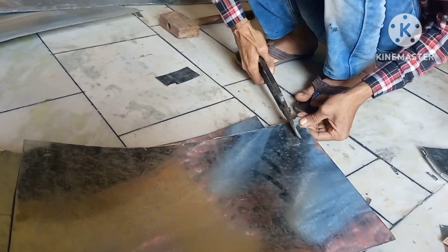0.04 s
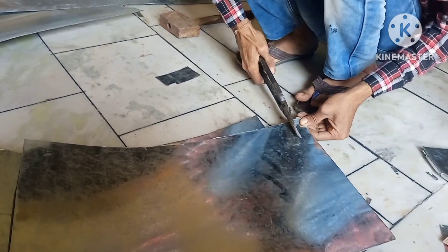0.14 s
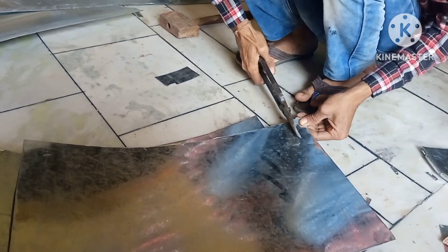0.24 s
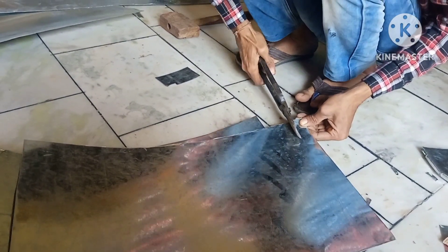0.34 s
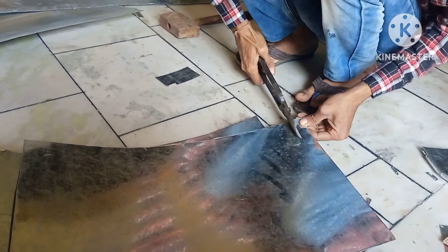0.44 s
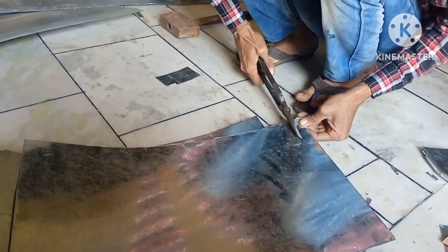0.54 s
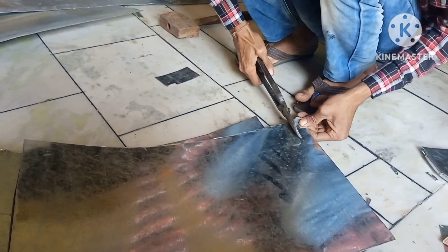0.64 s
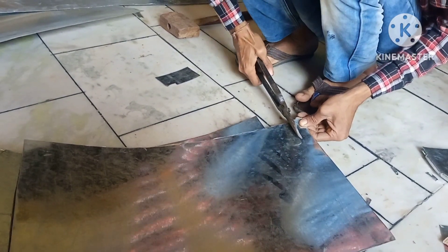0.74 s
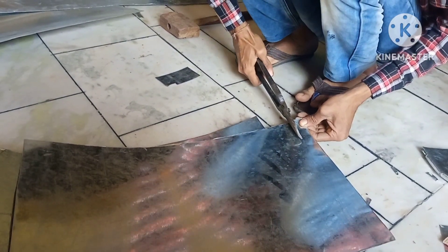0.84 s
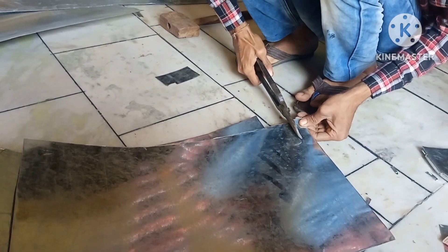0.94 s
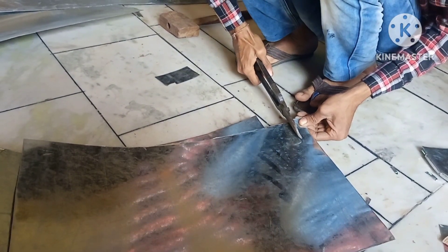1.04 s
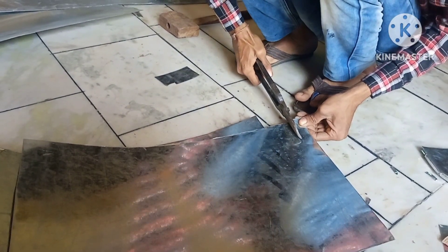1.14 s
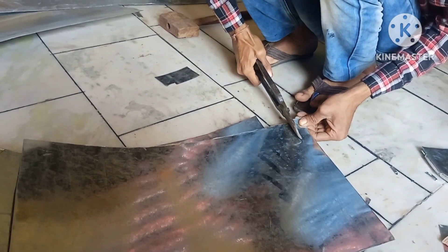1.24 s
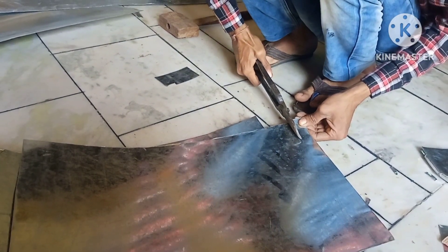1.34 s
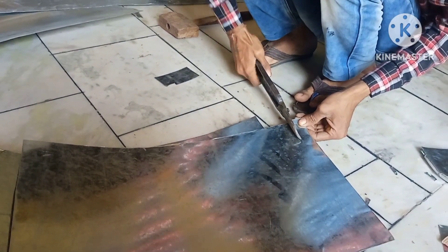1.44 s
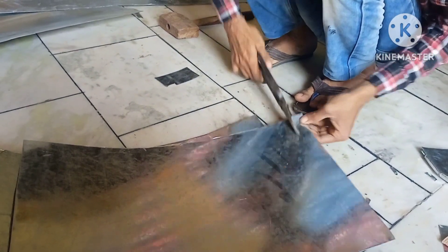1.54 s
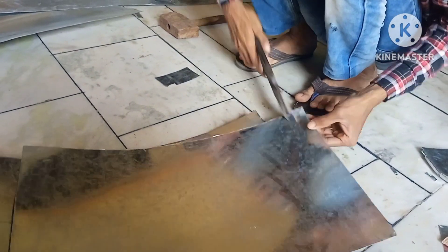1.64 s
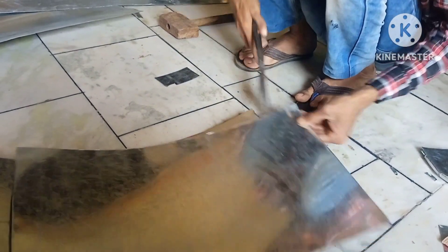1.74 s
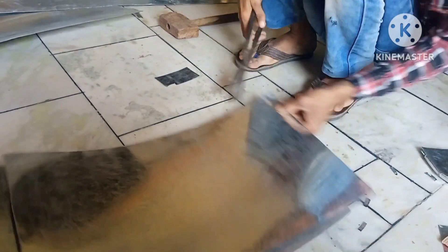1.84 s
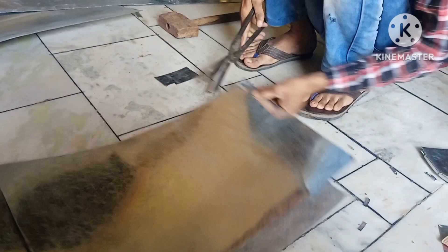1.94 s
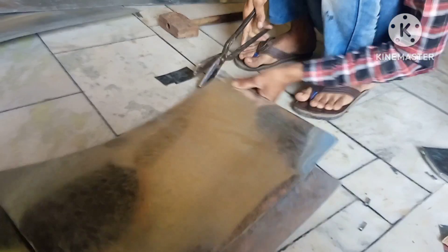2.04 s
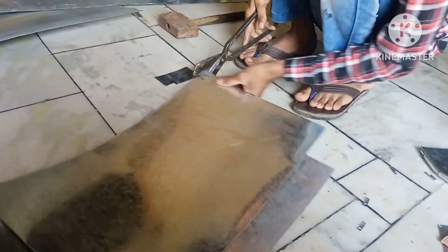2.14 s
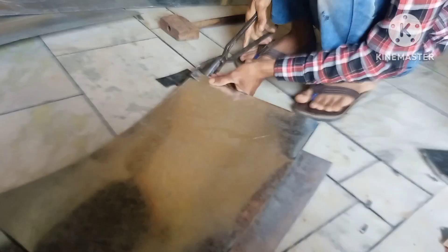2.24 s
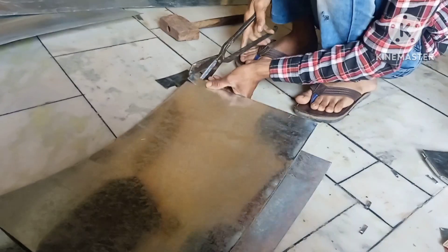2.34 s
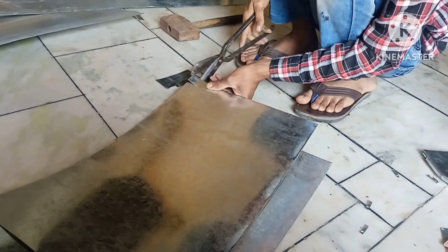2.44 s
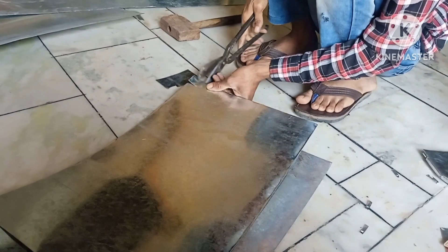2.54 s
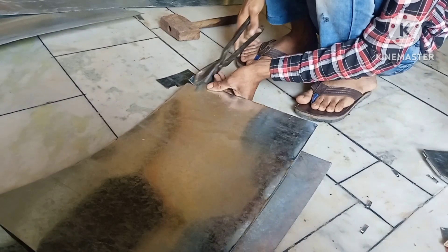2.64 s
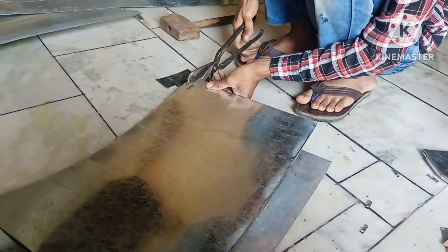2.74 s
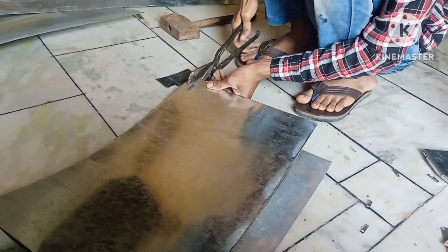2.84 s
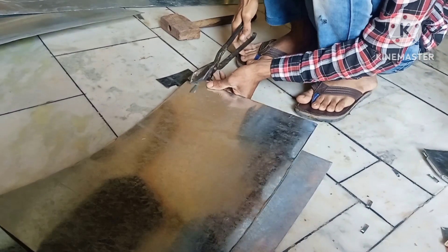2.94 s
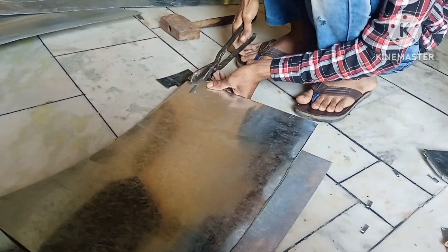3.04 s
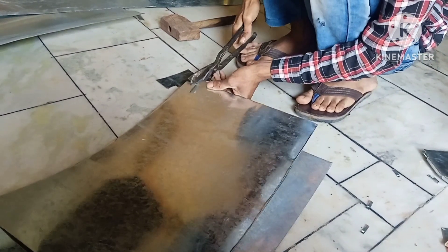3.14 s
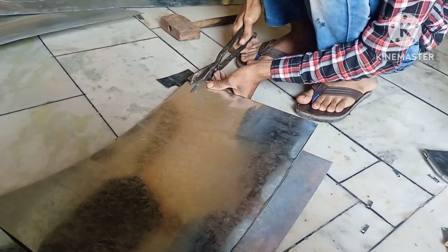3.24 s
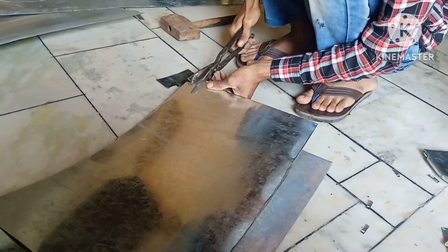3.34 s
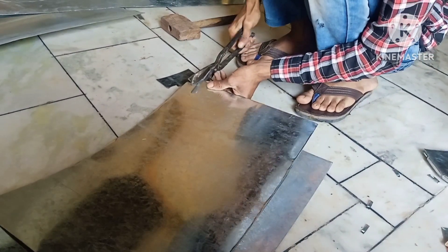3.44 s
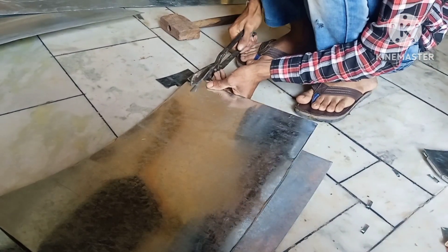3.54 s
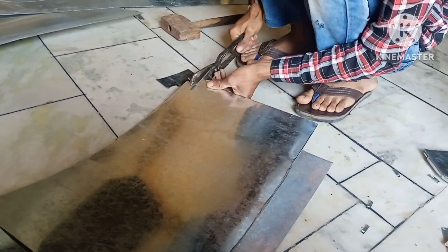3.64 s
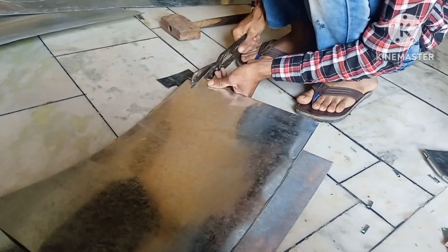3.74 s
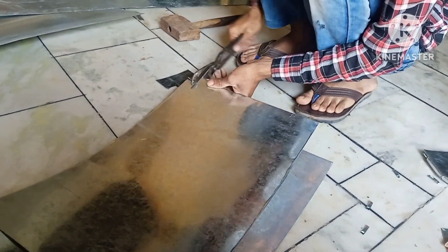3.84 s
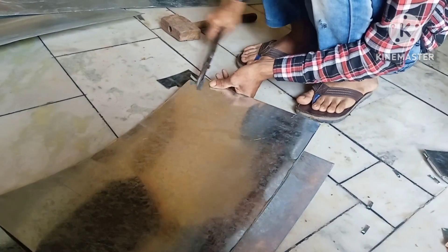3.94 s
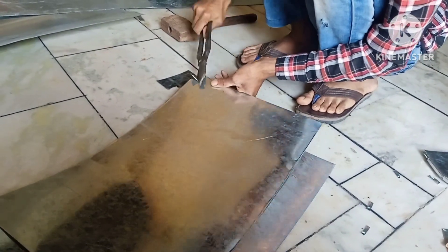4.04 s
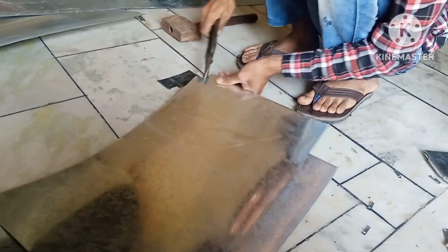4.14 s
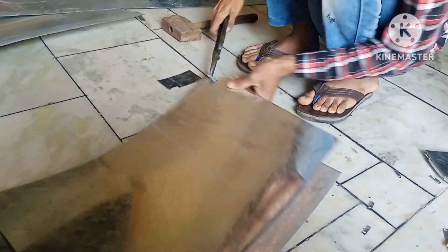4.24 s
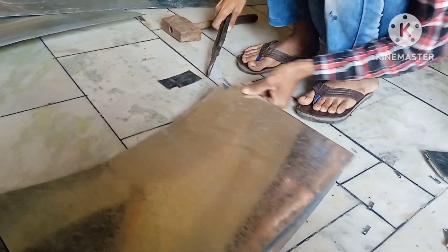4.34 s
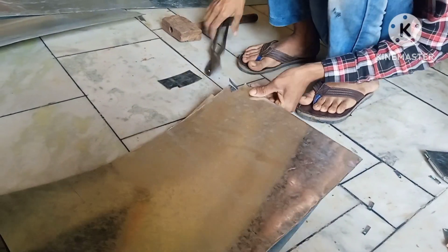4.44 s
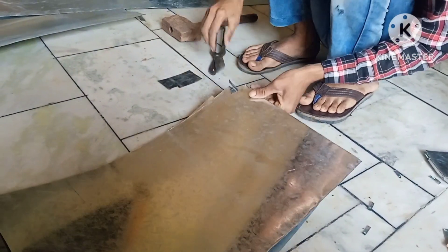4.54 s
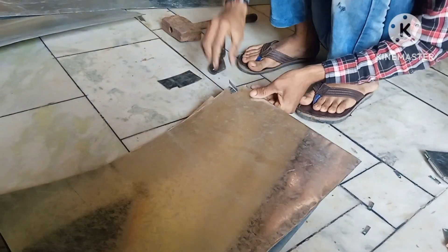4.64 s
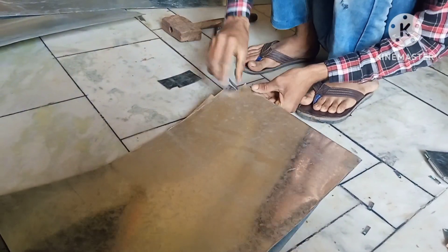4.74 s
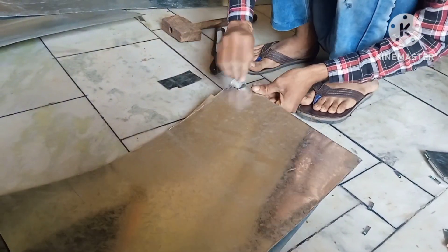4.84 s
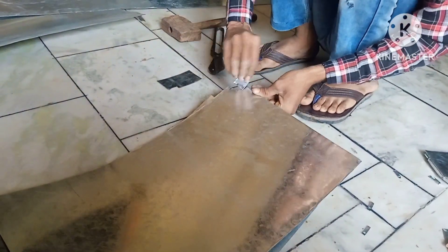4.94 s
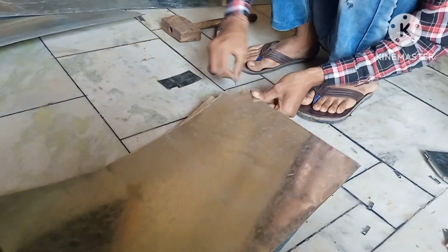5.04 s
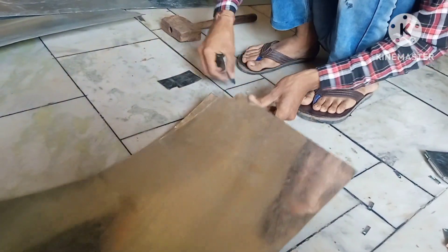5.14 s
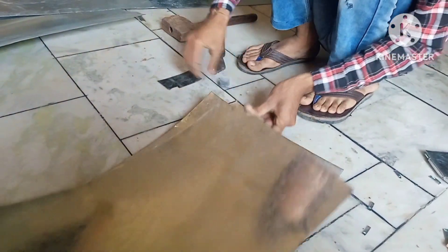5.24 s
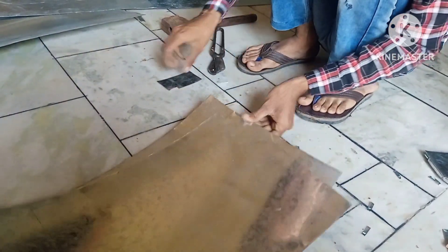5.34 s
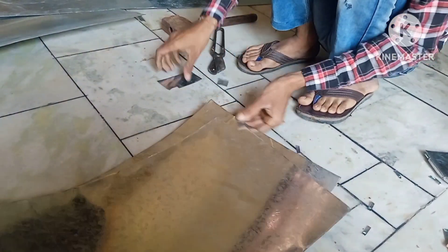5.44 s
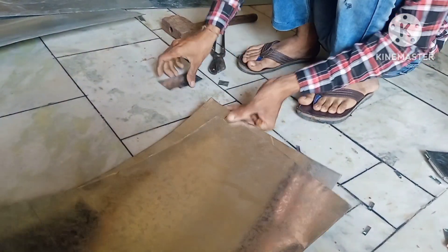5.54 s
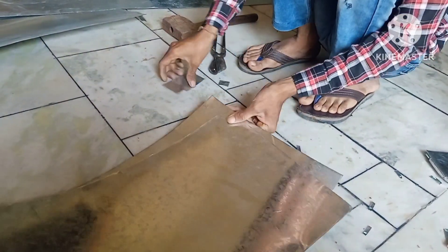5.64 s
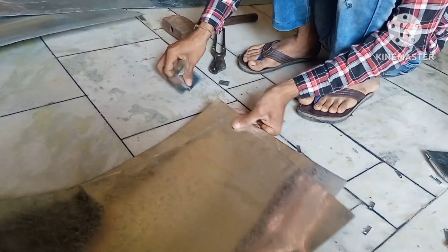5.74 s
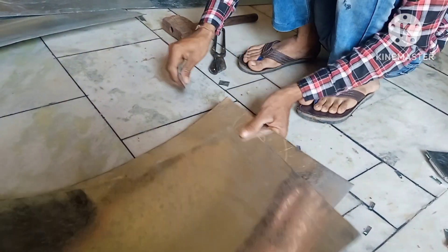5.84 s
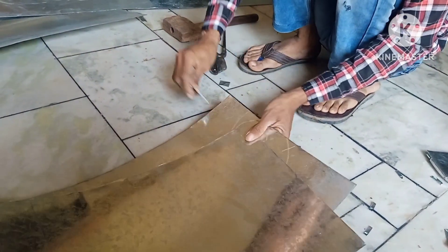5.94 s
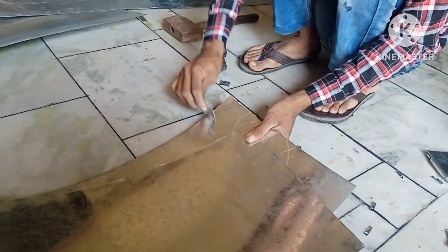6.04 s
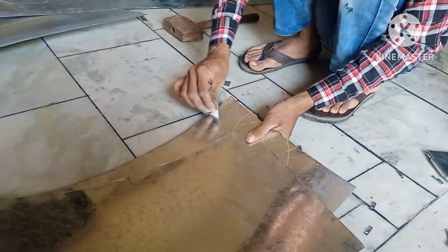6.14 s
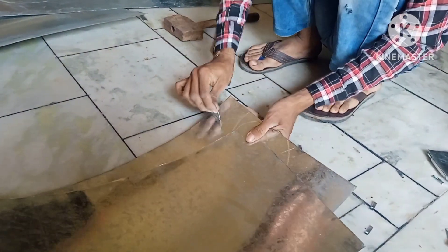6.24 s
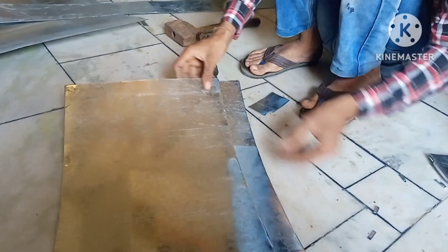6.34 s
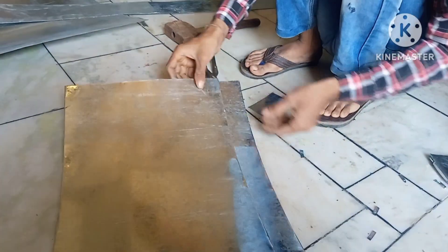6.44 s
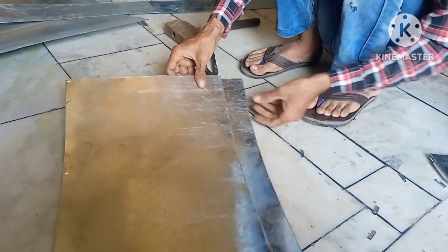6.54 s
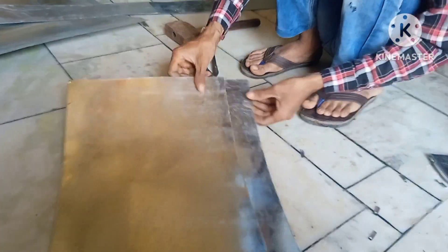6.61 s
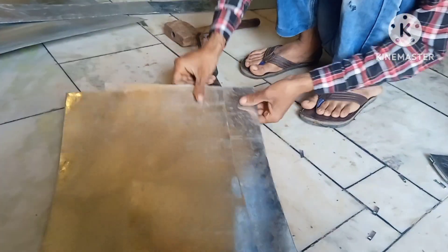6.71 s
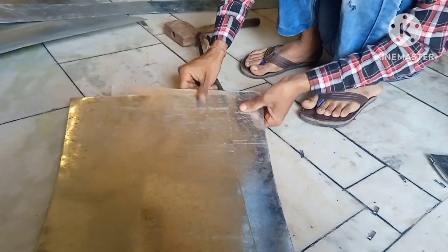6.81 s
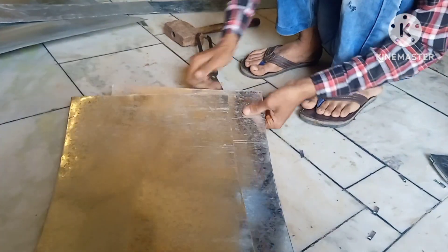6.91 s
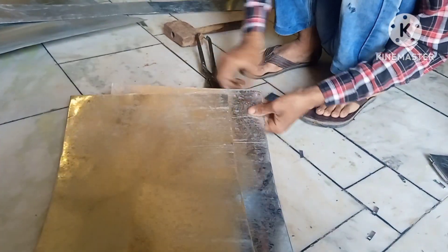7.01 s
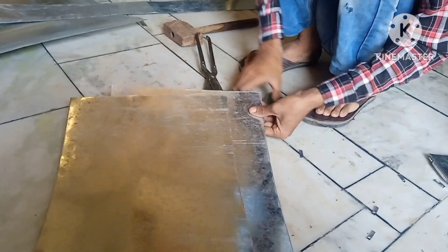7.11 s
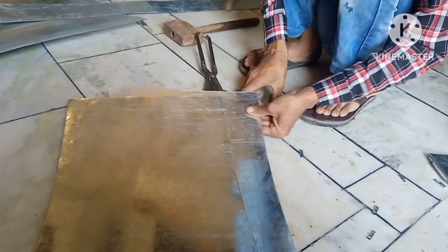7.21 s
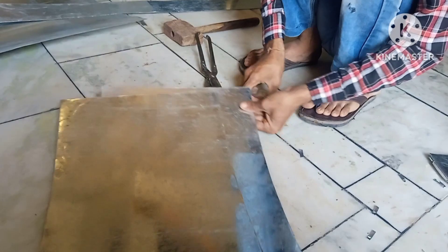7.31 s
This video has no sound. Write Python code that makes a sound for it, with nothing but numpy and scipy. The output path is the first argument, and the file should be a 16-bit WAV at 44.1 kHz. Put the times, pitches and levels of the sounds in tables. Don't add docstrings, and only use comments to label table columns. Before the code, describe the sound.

Close to a phone-like microphone in a hard-walled tiled workshop, a thin steel sheet gives soft bumps and a faint creak in the first 0.3 seconds, then there is quiet hum, fan drone and distant traffic, with barely audible squeaks around 1.2-1.5. At 1.6-2.2 the sheet is dragged, wobbling and scraping with sharp ticks; a strong hollow slap lands at 2.3, another at 2.65, and a corner springs free with a throbbing twang at 2.8. A duller slap at 3.15 leads to a lull with small ticks. Scraping swells at 4.2; snips hit the tiles from 4.35, bouncing hard at 4.55-4.65 with bright ringing. The fan weakens around 5. A small offcut rattles high and glassy at 5.3-5.7 as the sheet slides. The loudest bang cracks at 6.1, with further slaps to 6.3, then softer rubbing and ticks fade to 7.4.

```python
import sys
import numpy as np
from scipy import signal
from scipy.fft import rfft, irfft, next_fast_len
from scipy.io import wavfile
from scipy.ndimage import uniform_filter1d, map_coordinates

SR = 44100
rng = np.random.default_rng(int(sys.argv[2]) if len(sys.argv) > 2 else 0)


def how_loud(loudness_db):
    steps = np.asarray(loudness_db, float) / 20
    return 10 ** steps


def waveform_to_disk(signal):
    frames = np.transpose(np.atleast_2d(signal))
    scaled = np.clip(frames, -1, 1) * 32767
    samples = np.round(scaled).astype(np.int16)
    wavfile.write(sys.argv[1], SR, samples)


N = 325017
TIME = np.arange(N) / SR
POWER_STEP = SR // 1000


def unit(x):
    return x / np.sqrt(np.mean(x ** 2) + 1e-20)


def along(points, hz):
    f, v = np.transpose(points)
    return np.interp(np.log(hz + 1), np.log(f + 1), v)


def after(s, length):
    return slice(round(s * SR), round((s + length) * SR))


def wobble(rate, near=slice(None)):
    knots = rng.standard_normal(int(N * rate / SR) + 4)
    return map_coordinates(knots, [TIME[near] * rate])


def coloured(x, spectrum):
    m = next_fast_len(N + 8192)
    gain = how_loud(along(spectrum, np.fft.rfftfreq(m, 1 / SR)))
    return unit(irfft(rfft(x, m) * gain, m)[:N])


def shaken(spectrum, grain_db, modes_db):
    grains = rng.standard_normal(N) * how_loud(grain_db * wobble(700) + 0.5 * grain_db * wobble(60))
    z = signal.stft(grains, nperseg=1024)[2]
    field = uniform_filter1d(rng.standard_normal(z.shape), size=6, axis=1)
    modes = signal.istft(z * how_loud(modes_db * unit(field)), nperseg=1024)[1]
    return coloured(modes[:N], spectrum)


def dying(s, db, t60, rise, near=slice(None)):
    age = np.clip(TIME[near] - s, 0, None)
    return how_loud(db - 60 * age / max(t60, .01)) * (1 - np.exp(-age / rise))


def add_blow(out, s, db, modes, rise, share=1, flutter=.5, rate=40):
    hz, level, t60 = np.transpose(modes)[:, :, None]
    t = TIME[after(0, np.clip(share * t60.max(), .03, .7))]
    luck = rng.standard_normal((len(modes), 2))
    knots = rng.standard_normal((2, len(modes), 80))
    in_step, aside = [np.array([np.interp(t * rate, np.arange(80), k) for k in part]) for part in knots]
    fall = how_loud(db + level + 0.42 * luck[:, :1] - 60 * t / np.clip(share * t60, .02, .7))
    phase = 2 * np.pi * hz * t + 3 * luck[:, 1:]
    ring = fall * ((1 + flutter * in_step) * np.sin(phase) + flutter * aside * np.cos(phase))
    out[round(s * SR):][:len(t)] += ring.sum(axis=0) * (1 - np.exp(-t / rise))


def single_modes(rows, rise, flutter, rate):
    out = np.zeros(N + SR)
    for s, db, hz, t60 in rows:
        add_blow(out, s, db, [(hz, 0, t60)], rise=rise, flutter=flutter, rate=rate)
    return out[:N]


def throbbing(lines, depth):
    out = np.zeros(N)
    first_peak_s = .014
    for s, hz, db, t60, throb_hz in lines:
        near = after(s, .5)
        t = TIME[near] - s
        throb = 1 + depth * np.cos(2 * np.pi * throb_hz * (t - first_peak_s))
        out[near] += dying(s, db, t60, 0.0045, near) * throb * np.sin(2 * np.pi * hz * t)
    return out


# frequency in Hz, density in dB per Hz.
HUM_SPECTRUM = [(130, -32), (220, -10), (349, -3.5), (544, -21), (638, -17.5), (697, -11.5), (2130, -25),
                (2330, -23.5), (2550, -36), (4500, -39.5), (13700, -50), (14800, -41), (15450, -37.5)]
# nearest moment in seconds, width in seconds, rise in dB.
PASSES = [(0, 1, 7.4), (4.7, 0.2, 12), (5.87, 0.15, 4.9), (6.9, 0.51, 3.2)]


def background():
    traffic_db = -74 + sum(db * np.exp(-((TIME - s) / width) ** 2) for s, width, db in PASSES)
    fan_slows_s, fan_loses_db = 4.95, 11.5
    fan_db = -67.5 - fan_loses_db / (1 + np.exp((fan_slows_s - TIME) / .15))
    hum = how_loud(-76 + 0.43 * wobble(2.1)) * shaken(HUM_SPECTRUM, grain_db=3, modes_db=-0.5)
    traffic = coloured(rng.standard_normal(N),
                       [(30, -48.0), (48, -5.0), (58, -4.5), (90, -8.5), (120, -31.0), (200, -91.5)])
    fan = coloured(rng.standard_normal(N),
                   [(90, -27.0), (125, -4), (148, -4.0), (175, -13.5), (240, -17.0), (400, -97.0)])
    return hum + how_loud(traffic_db) * traffic + how_loud(fan_db) * fan


def stroke(s, held, db, up, down):
    t = TIME[::POWER_STEP]
    return how_loud(db - up * np.clip(s - t, 0, None) - down * np.clip(t - s - held, 0, None)) ** 2


# start in seconds, held in seconds, body level in dB,
# edge in dB over body, grit in dB over body.
PULLS = [(0, 0.02, -47.5, -21.5, -39), (.162, 0.022, -54, -26, -38), (.229, 0.019, -55, -19.5, -37),
         (1.589, 0.034, -54.5, -30, -45), (1.765, 0.034, -33.5, -12.5, -42), (2.65, 0.063, -53, -13, -30),
         (2.752, 0.026, -41, -13.5, -30), (2.784, 0.0077, -39.5, -21, -34), (2.955, .02, -71, -3, -37),
         (3.154, 0.016, -49.5, -25, -38), (4.355, 0.05, -40, -3.5, -11), (4.553, 0.13, -45, 5.5, -3.5),
         (4.632, 0.069, -41, -19, -41), (5.668, 0.022, -40, -16, -35), (6.12, 0.043, -29, -15, -39),
         (6.303, 0.048, -34.5, -9.5, -26)]
# start in seconds, held in seconds, body level in dB,
# edge in dB over body, grit in dB over body.
DRAGS = [(1.641, 0.099, -45.5, -14, -27), (1.842, .46, -36.5, -12.5, -28), (3.25, 0.47, -81, -25, -36),
         (3.77, 0.061, -68, -7, -17.5), (3.973, 0.41, -57.5, -8.5, -21.5), (4.251, 0.039, -36, -12.5, -29),
         (5.11, 0.13, -52, -31, -46), (5.36, 0.061, -36.5, -9, -26.5), (5.56, 0.093, -60.5, -8, -4),
         (5.855, 0.035, -53.5, 1, -7), (7.21, .04, -66, -12, -18), (5.805, 0.19, -37.5, -12.5, -36),
         (6.18, 0.087, -39, -15, -55), (6.6, 0.039, -47, -18, -36), (6.691, 0.028, -36, -17.5, -33.5),
         (6.76, 0.11, -49.5, -19.5, -30), (6.95, 0.2, -63, -10, -31), (7.25, .13, -59.5, -13.5, -15)]
# peak in seconds, seconds to gain 20 dB, body level in dB,
# edge in dB over body, grit in dB over body.
SWELLS = [(1.749, 0.0284, -44.5, -3, -12), (2.0, 0.1361, -37, -7.5, -29), (2.13, 0.19, -36, -11, -33),
          (2.218, 0.0721, -36.5, -9, -25), (3.74, 0.34, -52.5, -25, -57), (4.209, -0.12, -48, -12, -27.5),
          (4.307, 0.0246, -40, -9, -15.5), (4.52, 0.26, -44.5, -8, -17.5), (4.97, 0.08, -42, -16, -54),
          (5.089, -0.3, -43.5, -31, -52), (5.339, 0.2255, -32, -13.5, -28.5), (5.89, -1.52, -35, -13, -30),
          (6.59, -0.4, -55, -8, -18), (7.3, -3, -58, -6.5, -25.5)]
# start in seconds, held in seconds, boom level in dB.
WOBBLES = [(0, 0.051, -59), (1.759, 0.063, -52.5), (1.96, 0.12, -52), (2.28, 0.12, -58), (2.65, 0.039, -60),
           (2.783, 0.0082, -45.5), (3.155, 0.017, -57.5), (3.6, 0.14, -66.5), (4.24, 0.069, -55),
           (4.356, 0.027, -47), (4.551, 0.0042, -36.5), (4.58, 0.02, -51), (4.632, 0.058, -41),
           (4.84, 0.076, -54), (5.17, 0.28, -60.5), (5.665, 0.032, -58), (5.8, 0.27, -60),
           (6.117, 0.044, -55.5), (6.64, 0.25, -62), (7.25, .12, -68)]
# body, edge, grit and boom, in dB per second.
FADE_DB_PER_S = [106, 138.4, 138, 97]


def movements():
    grip, ease = 2505.5, 399
    moves = [(s, held, grip, *dbs) for s, held, *dbs in PULLS]
    moves += [(s, held, ease, *dbs) for s, held, *dbs in DRAGS]
    moves += [(s, 0, 20 / max(gain_s, .01), *dbs) for s, gain_s, *dbs in SWELLS]
    layers = []
    for k in range(3):
        layers.append(sum(stroke(s, held, db + [0, *over][k], up, FADE_DB_PER_S[k])
                          for s, held, up, db, *over in moves))
    layers.append(sum(stroke(*row, grip, FADE_DB_PER_S[-1]) for row in WOBBLES))
    return np.array([np.interp(TIME, TIME[::POWER_STEP], power) for power in layers])


# frequency in Hz, density in dB per Hz.
BODY_SPECTRUM = [(210, -51), (350, -39), (480, -20), (663, -3.5), (714, -1), (1230, 2), (1370, -2.5),
                 (1470, 2), (2250, -1.5), (3200, -26.5), (4160, -43), (7040, -120)]
# frequency in Hz, density in dB per Hz.
EDGE_SPECTRUM = [(1530, -22), (2600, 2), (3080, -0.5), (3840, -7.5), (4950, -11.5), (6180, -11.5),
                 (8000, -26), (10400, -27), (17600, -120)]
# frequency in Hz, density in dB per Hz.
GRIT_SPECTRUM = [(4120, -18.5), (7000, -3.5), (7820, -11), (9330, -8.5), (10200, -13), (13300, -19),
                 (14600, -10.5), (14900, -7), (15500, -6.5), (16000, -21)]
# frequency in Hz, density in dB per Hz.
BOOM_SPECTRUM = [(53, -48.5), (90, -32.5), (183, 1), (332, -6), (366, -2.5), (423, -3.5), (520, -1.5),
                 (680, -1.5), (1140, -120)]
# body, edge, grit and boom, in dB.
REST_DB = [-75.5, -84, -92.5, -77.5]
# start in seconds, body peak in dB, edge in dB over body, grit in dB over body.
SLAPS = [(0.159, -34.5, -13.5, -32), (0.227, -32, -15, -30), (1.583, -54, -30, -32), (1.764, -30, -5, -16),
         (2.293, -14.5, -31, -24), (2.647, -22.5, -16, -38), (2.782, -29, -26, -35),
         (3.155, -24.5, -26, -41), (4.352, -16, -3, -13.5), (4.547, -13, -13, -8),
         (4.953, -26.5, -30.5, -42), (5.071, -22.5, -26, -40), (5.664, -40.5, -20, -13.5),
         (6.1151, -5, -11.5, -26.5), (6.175, -15.5, -5, -36), (6.3, -24, -2.5, -6)]
# start in seconds, edge peak in dB, grit in dB over edge.
TICKS = [(1.6462, -58, -22), (1.6801, -35, -12), (1.9305, -35, -21.5), (2.0962, -28, -18),
         (2.1952, -26.5, -15), (2.4199, -38, -18), (2.485, -54, -14), (2.535, -60, -13), (2.582, -58, -10),
         (2.601, -54, -17), (2.952, -46, -19), (3, -47.5, -24), (3.1274, -54, -22), (3.14, -47.5, -30),
         (3.1712, -44, -20.5), (3.328, -66, -19), (3.581, -55.5, -17), (3.609, -57, -14),
         (3.7694, -57, -12), (3.788, -50.5, -22), (3.837, -43.5, -20), (4.0956, -39, -17),
         (4.875, -39, -11), (4.175, -38, -15.5), (5.2296, -45, -20), (5.7928, -37, -23), (5.85, -44, -8.5),
         (5.9785, -25.5, -27), (6.56, -41.5, -17), (6.584, -37.5, -30), (6.6643, -48, -18),
         (6.8254, -44.5, -13), (6.985, -63, -7), (7.145, -62, -11.5), (7.225, -54, -13)]
# start in seconds, edge peak in dB, grit in dB over edge.
CLINKS = [(5.287, -39.5, -10.5), (5.314, -40.5, -9.5), (5.472, -40, -0.5), (5.556, -48, -5),
          (5.493, -48.5, -3.5), (5.602, -47, -8), (5.65, -40, -8)]


def sheet():
    layer_gain = how_loud([[0.1], [7.0], [13.0], [-2.5]])
    body, edge, grit, boom = movements() * layer_gain ** 2 + how_loud(REST_DB)[:, None] ** 2
    for s, db, edge_db, grit_db in SLAPS:
        near = after(s, .3)
        body[near] += dying(s, db - 13.0, t60=0.088, rise=0.0015, near=near) ** 2
        edge[near] += dying(s, db + edge_db - 6.5, t60=0.13, rise=0.00029, near=near) ** 2
        grit[near] += dying(s, db + grit_db - 6.5, t60=0.21, rise=0.000304, near=near) ** 2
    for s, db, grit_db in TICKS + CLINKS:
        near = after(s, .15)
        edge[near] += dying(s, db - 6.5, t60=0.065, rise=0.0004, near=near) ** 2
        grit[near] += dying(s, db + grit_db, t60=0.12, rise=.0003, near=near) ** 2
    judder = 0.65 * wobble(25)
    bending = np.sqrt(body) * how_loud(judder) * shaken(BODY_SPECTRUM, grain_db=0.8, modes_db=3.0)
    scraping = np.sqrt(edge) * how_loud(2.0 * judder) * shaken(EDGE_SPECTRUM, grain_db=1.0, modes_db=-2.5)
    crunching = np.sqrt(grit) * how_loud(2.0 * judder) * shaken(GRIT_SPECTRUM, grain_db=0.5, modes_db=-5.0)
    flexing = np.sqrt(boom) * shaken(BOOM_SPECTRUM, grain_db=4.0, modes_db=4.0)
    return bending + scraping + crunching + flexing


# start in seconds, level in dB, frequency in Hz, t60 in seconds.
CREAKS = [(2.295, -42, 677, 0.46), (0, -56, 662, 0.61), (0, -53, 1143, 0.26), (.002, -53, 1410, 0.25),
          (2.296, -35.5, 1313, 0.28), (2.3, -45.5, 873, 0.4), (3.156, -52, 672, 0.22),
          (3.53, -63.5, 676, 0.55), (3.75, -53, 800, 0.1), (4.246, -47, 1518, .4),
          (4.27, -38.5, 1720, 0.34), (4.3, -42.5, 1680, .2), (6.116, -30, 2393, 0.33),
          (6.116, -36, 1002, 0.27), (6.7, -45, 1703, .3), (3.66, -59, 669, 0.4), (3.73, -50, 686, 0.088),
          (4.152, -44, 1523, 0.17), (4.629, -41.5, 1008, 0.37), (4.635, -47, 607, 0.14),
          (4.901, -48, 1190, 0.41), (5.066, -41.5, 1114, 0.15), (6.587, -49, 900, 0.38),
          (7.21, -74, 4400, 0.11)]
# start in seconds, level in dB, frequency in Hz, t60 in seconds.
SQUEAKS = [(1.2, -76.5, 2400, 0.25), (1.24, -82, 2500, .2), (1.37, -93, 4300, .3), (1.47, -85, 4600, 0.18),
           (1.495, -88, 5550, .3), (1.51, -79, 2800, .2), (1.52, -86, 5280, .2)]


def creaks():
    return single_modes(CREAKS + SQUEAKS, rise=0.0059, flutter=1.7, rate=95)


# start in seconds, level in dB.
KNOCKS = [(0.158, -53), (0.2258, -50), (1.584, -67), (1.752, -41), (2.097, -41), (2.1942, -33),
          (2.2939, -37), (3.836, -54), (4.052, -52), (4.0954, -51), (5.071, -52), (5.9788, -26.5),
          (6.1137, -26), (6.122, -25), (6.1767, -20.5), (6.299, -38), (6.6963, -46)]
# frequency in Hz, level in dB, t60 in seconds.
SNAP_MODES = [(800, -17, 0.019), (1283, 1, 0.027), (1773, 4, 0.03), (2500, -3.5, .02), (3180, -4.5, .02)]


def grain_snaps():
    out = np.zeros(N + SR)
    for s, db in KNOCKS:
        add_blow(out, s, db, SNAP_MODES, rise=0.00035, flutter=0.63, rate=97)
    return out[:N]


# start in seconds, peak in dB, frequency in Hz, t60 in seconds.
THUDS = [(1.346, -48, 350, 0.046), (2.289, -48, 246, 0.17), (2.647, -47, 239, 0.11),
         (2.789, -45, 223, 0.11), (3.151, -55, 263, 0.097), (4.355, -27.5, 218, 0.05),
         (4.546, -23.5, 227, 0.077), (4.547, -27, 604, 0.022), (4.637, -42, 206, 0.15),
         (6.296, -57, 170, 0.019), (7.139, -58.5, 312, 0.23)]


def tile_thuds():
    return single_modes(THUDS, rise=0.0019, flutter=0.43, rate=17)


# start in seconds, level in dB.
CLACKS = [(2.648, -57), (2.753, -59)]
# frequency in Hz, level in dB, t60 in seconds.
BLADE_MODES = [(5001, -13, 2.6), (5690, -9, 0.35), (5792, -5, 0.16), (6578, -9, 0.4), (6971, -8, 0.4),
               (7700, -3, 0.2), (8183, -13, 0.34), (8850, -8, 0.38), (9570, -4, 0.1), (9895, -25, 0.18),
               (14960, -6, 0.17)]


def blade_clacks():
    out = np.zeros(N + SR)
    for s, db in CLACKS:
        add_blow(out, s, db, BLADE_MODES, rise=0.0015, share=1.0, flutter=0.5, rate=70)
    return out[:N]


# start in seconds, peak in dB.
FLEXES = [(2.783, -18.5), (2.847, -31), (2.872, -31.5)]
# frequency in Hz, level in dB, t60 in seconds.
CORNER_MODES = [(727, -5, 0.22), (790, -6, 0.26), (853, -8, 0.27), (965, -1, 0.16), (1172, -9, 0.26),
                (1285, -16, 0.17), (1660, -15, .2), (1785, 1.5, 0.12), (1943, -12, 0.32), (2105, -14, 0.28),
                (2330, -12, .21), (2500, -13, .15), (2800, -18, 0.28), (2934, -24, 0.23)]
# start in seconds, frequency in Hz, level in dB,
# t60 in seconds, throbs a second.
TWANGS = [(2.79, 760, -32.5, 0.35, 20.2), (2.84, 2105, -44, 0.26, 14), (2.785, 1790, -36, 0.22, 37)]


def corner():
    out = np.zeros(N + SR)
    for s, db in FLEXES:
        add_blow(out, s, db - 9.5, CORNER_MODES, rise=0.0083, share=0.72, flutter=0.78, rate=54.0)
    return out[:N] + throbbing(TWANGS, depth=0.82)


# start in seconds, frequency in Hz, level in dB, t60 in seconds, throbs a second.
RAPS = [(4.545, 1010, -23, 0.04, 0), (4.545, 820, -23.5, 0.037, 0), (4.351, 950, -30, 0.046, 0)]


def tile_raps():
    return throbbing(RAPS, depth=0)


# start in seconds, peak in dB, extra level of the handle modes in dB.
DROPS = [(4.3548, -19, -15.5), (4.5188, -29, -13), (4.55, -16.5, 5.5), (4.564, -6.5, -6.5),
         (4.5894, -8, -5.5), (4.6014, -18, -9.5), (4.634, -9.5, 0), (4.6556, -18, -17), (4.689, -33.5, -22),
         (4.738, -36.5, 14.5), (4.8738, -50, 9), (5.055, -48.5, 3)]
SNIPS_HZ = [2500, 2711, 2982, 3051, 3112, 3805, 3839, 4050, 4086, 4915, 5044, 5744, 5803, 5849, 6422, 6750,
            7052, 7500, 7946, 8586, 8620, 8667, 8829, 9593, 9900, 10710, 11350, 11480, 12590, 12800, 14580,
            14980, 15440]
# level in dB, t60 in seconds.
SNIPS_MODES = [(-18.5, 0.82), (-12, 0.367), (-19, 0.38), (-12.5, 0.41), (-15.5, 0.4), (-13.5, 0.45),
               (-11.5, 0.32), (-4, 0.403), (-6, 0.38), (-15, 0.38), (-13.5, .45), (-10, 0.436), (-7.5, 0.3),
               (-3.5, 0.29), (-10.5, 0.38), (-9.5, 0.46), (-10.5, 0.32), (-11.5, 0.33), (-11, 0.21),
               (-6.5, 0.36), (-24, 0.23), (-6, 0.19), (-6, 0.31), (-9, 0.2), (-13.5, 0.27), (-17, .35),
               (-22, 0.37), (-14.5, 0.25), (-15.5, 0.27), (-19, 0.33), (-12, 0.26), (-9, 0.22), (-7, 0.16)]
WAGGING_HZ = [2711, 4086]
# start in seconds, frequency in Hz, level in dB,
# t60 in seconds, throbs a second.
HANDLES = [(4.549, 2711, -24.5, 0.87, 21.7), (4.56, 4086, -31.5, 0.6, 34), (4.63, 3060, -35, 0.66, 42),
           (4.575, 1510, -46, 0.95, 14.3), (4.519, 8620, -37.5, 0.47, 55), (4.516, 14980, -43, 0.53, 40)]


def snips():
    out = np.zeros(N)
    near = slice(round(DROPS[0][0] * SR), round((DROPS[-1][0] + .4) * SR))
    t = TIME[near]
    s, db, handle_db = np.transpose(DROPS)[:, :, None]
    age = np.clip(t - s, 0, None)
    for hz, (level, t60) in zip(SNIPS_HZ, SNIPS_MODES):
        struck = db - 16.0 + level + handle_db * (hz < 6500) + 0.5 * rng.standard_normal(s.shape)
        rings = how_loud(struck - 60 * age / t60) * (1 - np.exp(-age / 0.0022))
        crowd = hz / 70
        deep = 1.35 if hz > 6300 else .8
        swell = how_loud(4 * wobble(max(crowd, 60), near))
        beat = swell * np.sin(2 * np.pi * hz * t + 1.6 * deep * wobble(.8 * crowd, near))
        out[near] += np.sqrt(np.sum(rings ** 2, axis=0)) * beat * (hz not in WAGGING_HZ)
    return out + throbbing(HANDLES, depth=.9)


# start in seconds, main level in dB, low line in dB, high lines in dB.
ROCKS = [(5.285, -22, -40, -63), (5.301, -30, -50, -43), (5.312, -11, -48, -44), (5.334, -37, -41, -64),
         (5.372, -35, -50, -66), (5.41, -45, -49, -62), (5.433, -35, -52, -56), (5.448, -15, -55, -47),
         (5.468, -11, -37.5, -50), (5.499, -15, -44, -40.5), (5.532, -70, -50, -51), (5.555, -20, -58, -57),
         (5.578, -26, -49.5, -45), (5.62, -35, -60, -43.5), (5.675, -44, -70, -72)]
# main, low and high lines, t60 in seconds.
ROCK_T60_S = [0.11, 0.33, 0.17]
# frequency in Hz, level in dB.
OFFCUT_MAIN = [(6910, -25), (6640, -28), (14900, -29)]
# frequency in Hz, level in dB.
OFFCUT_TOP = [(9760, -1), (8520, -11)]
TWINS_HZ = [6762, 6794]
# start in seconds, level in dB.
TWIN_BLOWS = [(5.282, -43), (5.298, -31.5), (5.431, -41), (5.466, -22.5), (5.56, -34.5), (5.616, -39),
              (5.672, -55)]


def offcut():
    out, near = np.zeros(N), after(5.25, .7)
    t = TIME[near]
    for k, lines in enumerate([OFFCUT_MAIN, [(5346, -3.5)], OFFCUT_TOP]):
        power = sum(dying(s, dbs[k], ROCK_T60_S[k], 0.0054, near) ** 2 for s, *dbs in ROCKS)
        for hz, db in lines:
            level = np.sqrt(power) * how_loud(db + 6.5 + 2.6 * wobble(105, near))
            out[near] += level * np.sin(2 * np.pi * hz * t + 1.4 * wobble(hz / 110, near))
    for s, db in TWIN_BLOWS:
        low, high = 2 * np.pi * np.outer(TWINS_HZ, t - s)
        out[near] += dying(s, db, .33, 0.0032, near) * (np.sin(low) - 0.97 * np.sin(high))
    return out


# frequency in Hz, t60 in seconds.
ROOM_T60 = [(300, 0.7), (2000, 0.59), (6000, 0.58), (14000, 0.11)]


def room(x):
    hz, t, z = signal.stft(rng.standard_normal(int(.7 * SR)), SR, nperseg=256)
    tail = signal.istft(z * how_loud(-60 * t / along(ROOM_T60, hz)[:, None]), SR, nperseg=256)[1]
    delayed = np.pad(x, (300, 0))
    return signal.fftconvolve(delayed, tail / np.linalg.norm(tail))[:N]


def scene():
    distant = background()
    steel = sheet() + offcut()
    rings = creaks() + grain_snaps() + tile_thuds() + blade_clacks() + corner() + tile_raps() + snips()
    echoes = room(how_loud(-9.0) * rings + how_loud(-12.5) * steel)
    return (steel + rings + echoes + distant)[None]


def low_pass(x):
    return signal.sosfilt(signal.butter(12, 16500, fs=SR, output="sos"), x)


def record(dry):
    hz = np.fft.rfftfreq(N, 1 / SR)
    top_hz, top_slope_hz, bass_hz = 15600, 170, 55.0
    treble_limit = np.clip((top_hz - hz) / top_slope_hz, 0, 1) ** 2
    bass_limit = hz ** 4 / (hz ** 4 + bass_hz ** 4)
    mix = irfft(rfft(dry) * treble_limit * bass_limit, N)
    return low_pass(mix)


dry = scene()
out = record(dry)
waveform_to_disk(out)
```